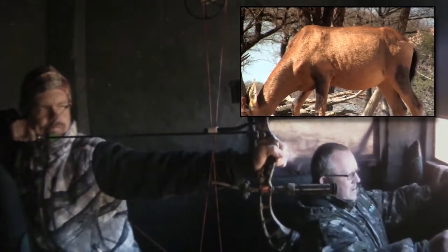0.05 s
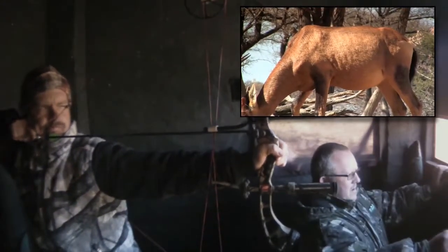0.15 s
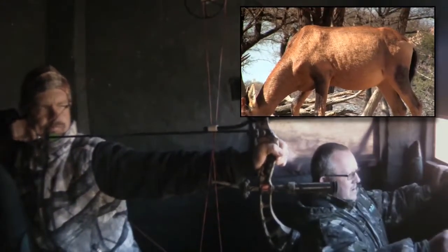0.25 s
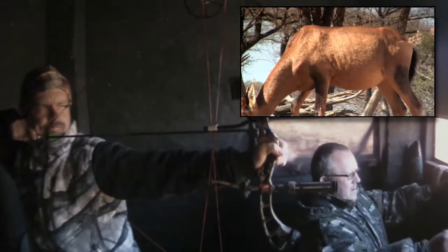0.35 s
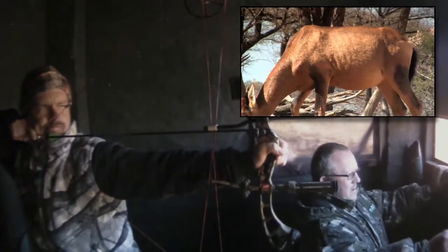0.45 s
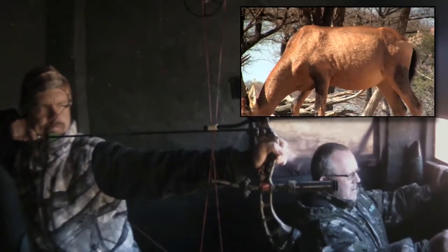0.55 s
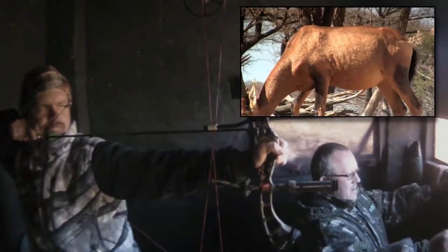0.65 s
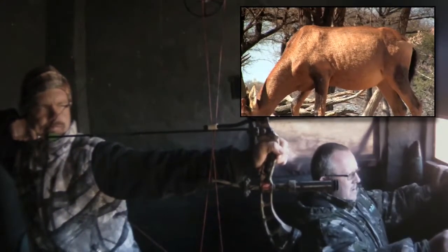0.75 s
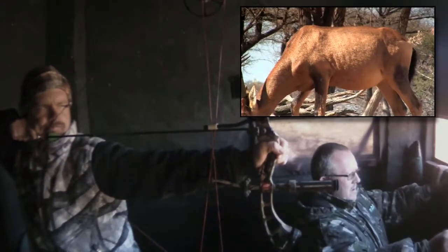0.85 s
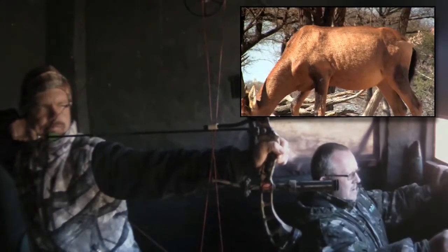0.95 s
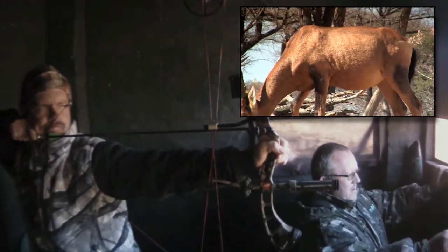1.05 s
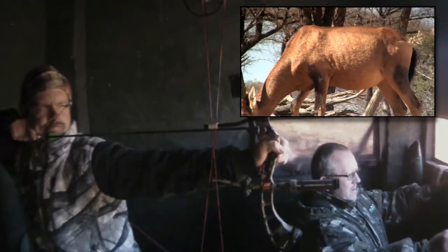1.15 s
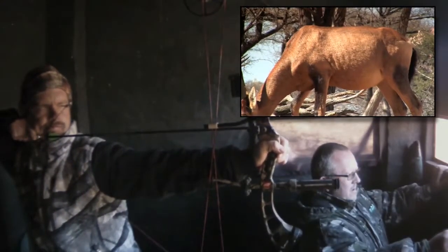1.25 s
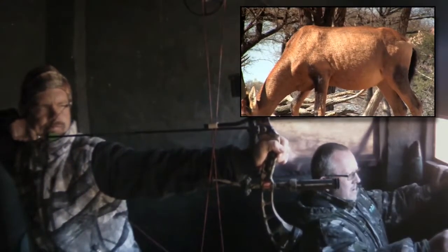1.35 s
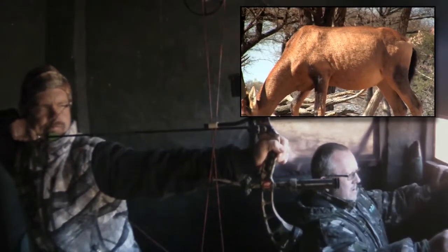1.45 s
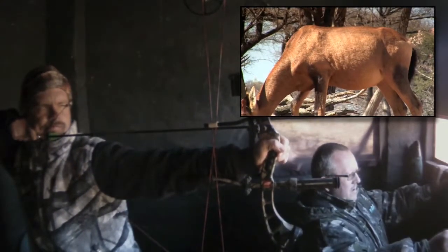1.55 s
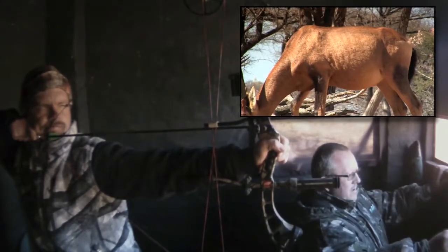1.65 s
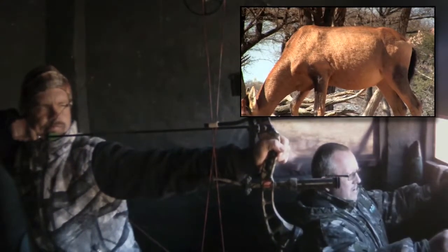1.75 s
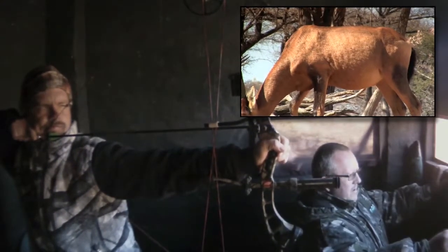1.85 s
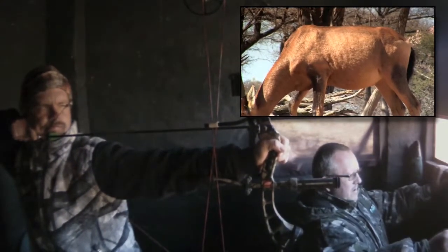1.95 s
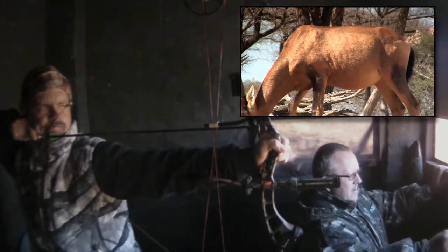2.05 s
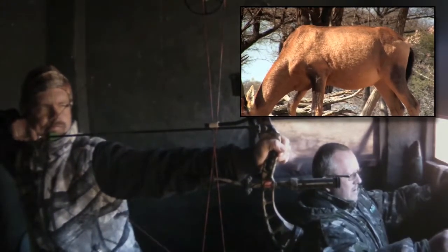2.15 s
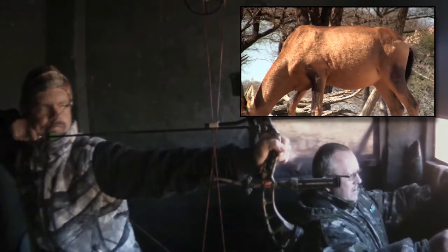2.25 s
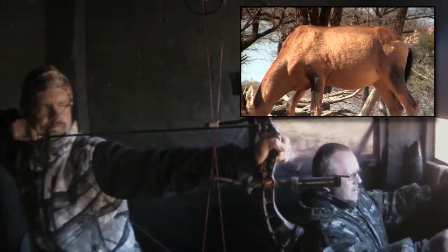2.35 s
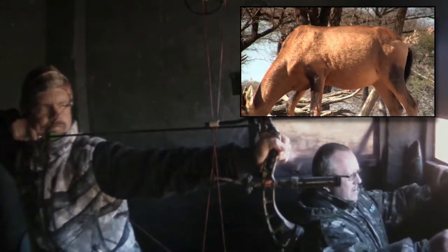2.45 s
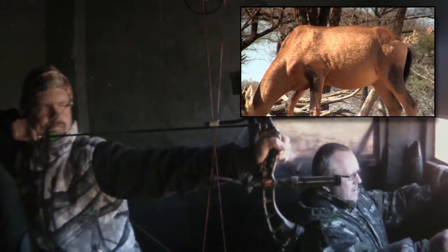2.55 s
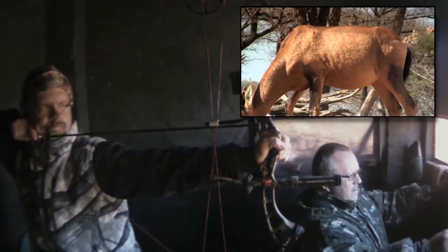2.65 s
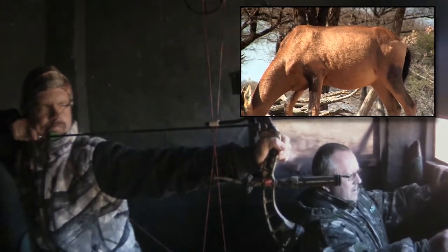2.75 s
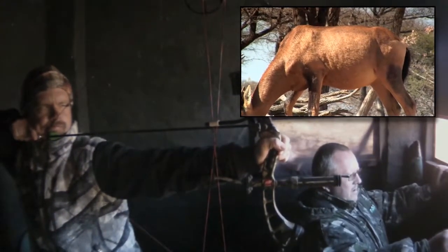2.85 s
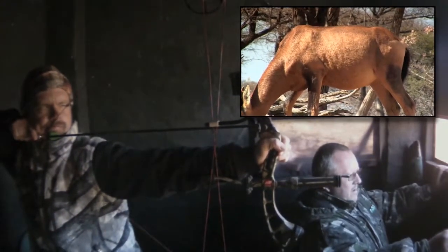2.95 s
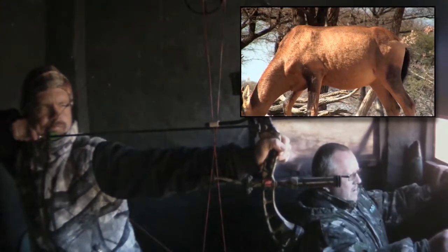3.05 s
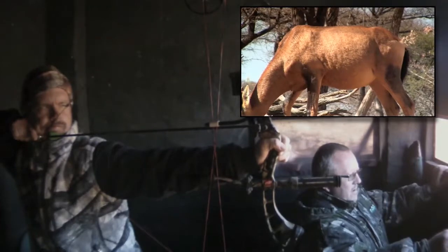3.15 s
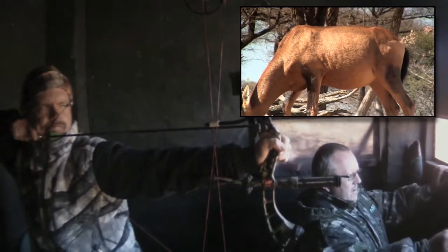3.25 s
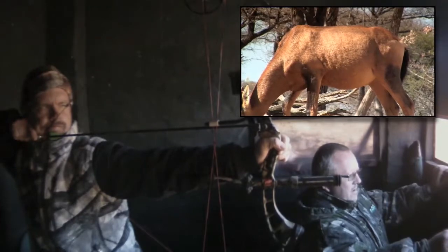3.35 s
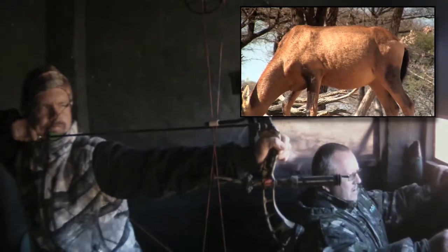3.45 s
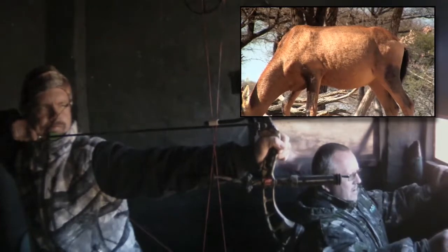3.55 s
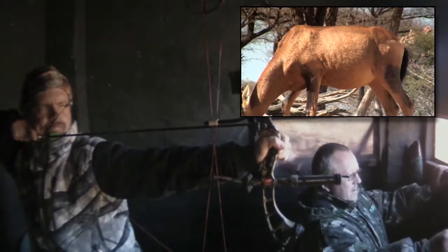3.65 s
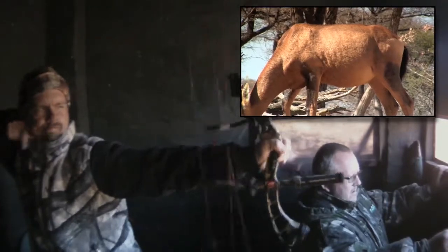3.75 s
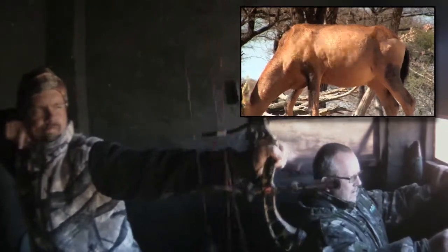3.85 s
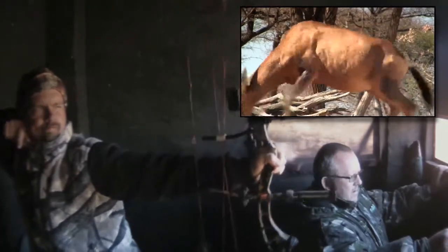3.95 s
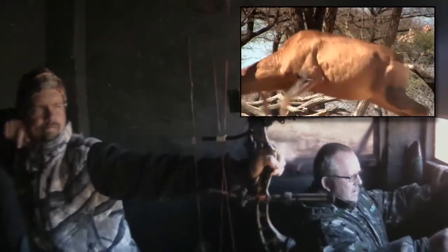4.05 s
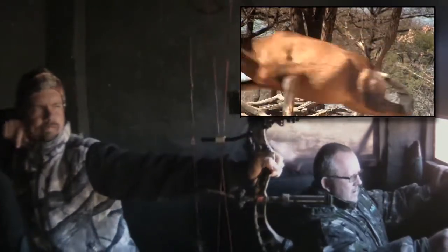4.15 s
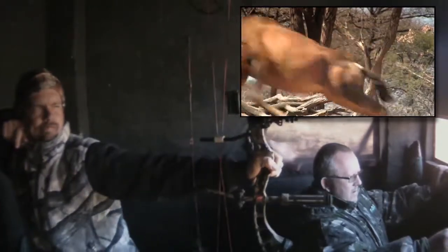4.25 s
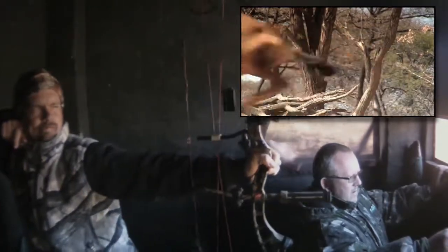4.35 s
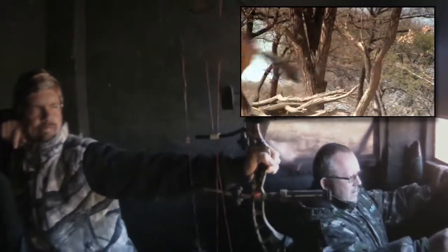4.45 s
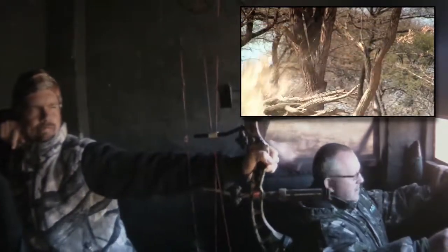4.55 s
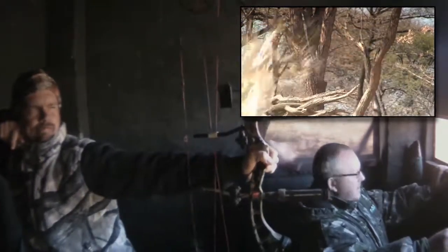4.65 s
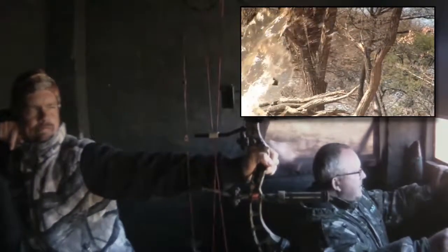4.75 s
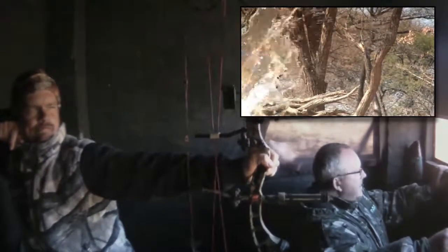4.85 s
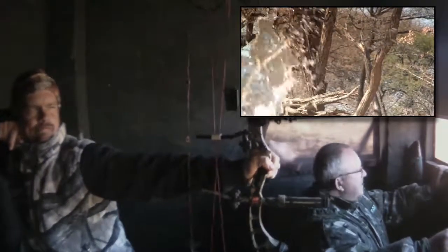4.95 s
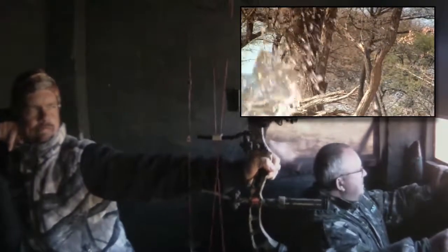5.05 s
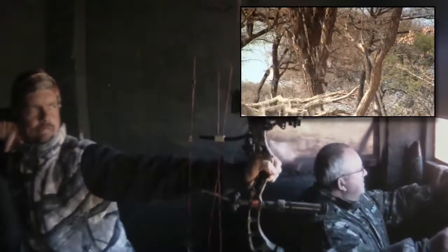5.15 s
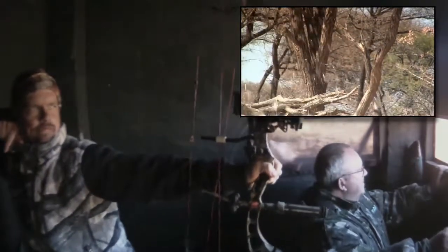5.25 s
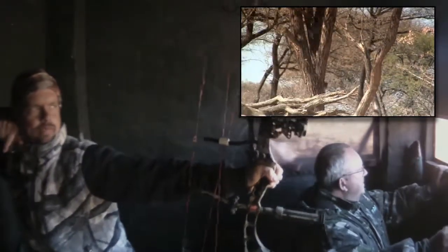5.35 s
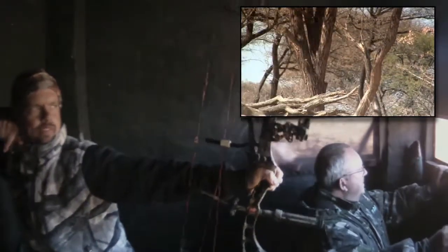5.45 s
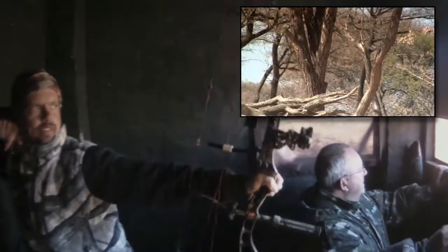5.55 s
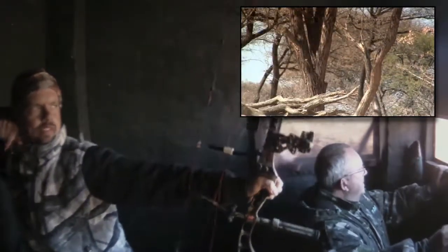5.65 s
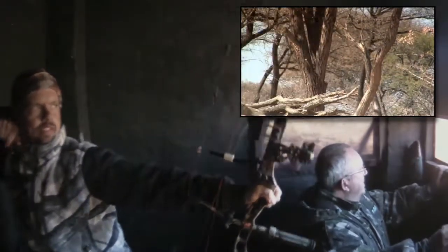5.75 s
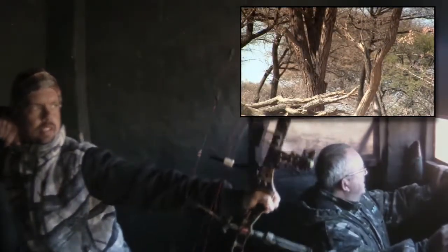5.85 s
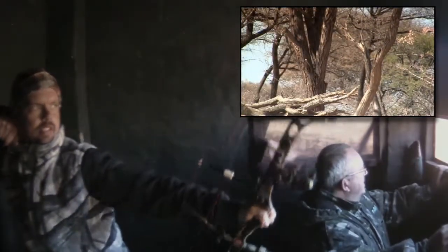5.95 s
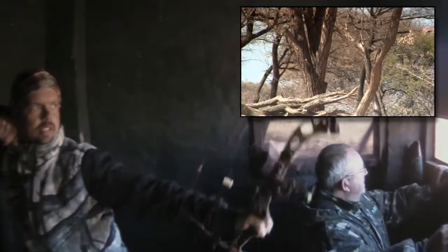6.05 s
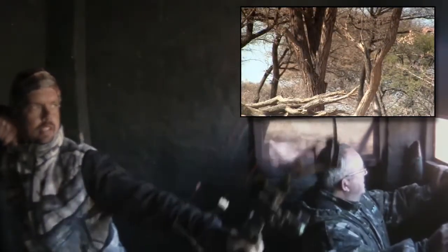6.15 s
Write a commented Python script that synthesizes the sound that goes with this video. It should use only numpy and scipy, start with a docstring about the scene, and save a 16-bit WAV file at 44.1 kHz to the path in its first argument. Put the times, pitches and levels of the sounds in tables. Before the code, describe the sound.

Close, quiet recording position in a blind: gentle hiss, tiny sleeve-like swishes, a few husky chirps far off. After nearly four seconds a bow string slaps home, limbs humming, followed a fraction of a second later by a sharp rattling crack of impact, centred and resonant. The animal leaps off with hollow, muffled hoofbeats, scuffs and sprayed pebbles, fading within two seconds into faint rustle.

```python
"""Over steady microphone hiss, shaped noise with swelling gain makes a faint treble rustle, perhaps of
a sleeve, and gliding sines make a distant bird. A compound bow is then loosed inside a hunting blind:
noise bursts are the string slapping home and dying sines the humming limbs. A moment later bright
bursts crack as the arrow strikes an antelope, whose chest rings. The animal gallops off over dry
ground, in chance knocks that ring hollow modes, scuffs of noise and a spray of grit and pebbles."""
import sys
import numpy as np
from scipy import signal
from scipy.io import wavfile
from scipy.ndimage import uniform_filter1d

SR = 44100
rng = np.random.default_rng(int(sys.argv[2]) if len(sys.argv) > 2 else 0)


def master(y):
    """Save y as 16-bit WAV."""
    cut = np.clip(np.atleast_2d(y).T, -1, 1)
    pcm = np.round(cut * 32767)  # scale
    wavfile.write(sys.argv[1], SR, pcm.astype(np.int16))


N = 273506

# Likeness of the two channels for sounds from ahead. Each row: frequency in Hz, likeness from 0 to 1.
AHEAD_LIKENESS = [(100, 1), (15000, 1)]


def gain_of(db):
    """Amplitude ratio: 20 dB is a factor of ten."""
    return 10 ** (np.asarray(db) / 20)


def evened(x):
    """Normalization: scales to a root mean square of 1."""
    return x / np.sqrt(np.mean(x ** 2) + 1e-20)


def read(points, hz):
    """Spectral interpolation: reads a table in straight lines over log frequency."""
    f, value = np.transpose(points)
    return np.interp(np.log(hz + 1), np.log(f + 1), value)


def noise(count, colour, likeness, size=512, tilt_db=0., decay=None, patchy_db=0., balance=None):
    """Spectral shaping: random short-time spectra are weighted by band, and correlated between channels."""
    hop = size // 4
    frames = count // hop + 5
    hz = np.fft.rfftfreq(size, 1 / SR)
    a, b, c, d, patches = rng.standard_normal((frames, len(hz), 5)).T
    # smoothing over neighbouring bands and frames makes the patches
    patches = uniform_filter1d(patches, size=8, axis=0)
    patches = evened(uniform_filter1d(patches, size=8, axis=1))

    alike = np.clip(read(likeness, hz), -1, 1)[:, None]
    left = a + 1j * b
    right = alike * left + np.sqrt(1 - alike ** 2) * (c + 1j * d)
    spectra = np.array([left, right])

    octaves = np.log2((hz + 100) / 2000)
    shape = evened(gain_of(read(colour, hz) + tilt_db * octaves))
    spectra *= shape[:, None] * gain_of(patchy_db * patches) / np.sqrt(size / 2)
    if balance:
        spectra[1] /= gain_of(read(balance, hz))[:, None]
    if decay:
        frame_s = np.arange(frames) * hop / SR
        spectra *= gain_of(-60 * frame_s / read(decay, hz)[:, None])
    return signal.istft(spectra, nperseg=size, noverlap=size - hop)[1][:, :count]


def ring(modes, t, rise_s):
    """Modal decay: a sum of sines, each at a chance phase and falling 60 dB in its own t60."""
    tones = 0
    for hz, db, t60 in modes:
        tones = tones + gain_of(db - 60 * t / t60) * np.sin(2 * np.pi * (hz * t + rng.random()))
    return tones * (1 - np.exp(-t / rise_s))


def add(mix, s, sound):
    """Superposition: adds a sound to the mix from time s on."""
    part = mix[:, round(s * SR):][:, :sound.shape[-1]]
    part += sound[..., :part.shape[1]]


def flutter(spread_db, count):
    """Random amplitude modulation: quick unevenness of level, as from many small contacts."""
    wander = evened(uniform_filter1d(rng.standard_normal(N), size=count))
    return evened(gain_of(spread_db * wander))


def swishes():
    """Amplitude envelope: the rustle's gain is a smooth hump for each swish over a low bed."""
    # Swishes of the rustle. Each row: middle in seconds, length in seconds, peak level in dB, added
    # to the bed.
    humps = [(.03, .07, -58.5), (.335, .05, -58.5), (.53, .07, -62), (0.622, .06, -64), (.845, .08, -62),
             (1.13, .06, -59.5), (1.32, .06, -65), (1.412, .05, -63), (1.627, .07, -61), (1.715, .045, -61),
             (1.93, .045, -61.5), (2.02, 0.046, -65), (2.13, .04, -64), (2.227, .045, -64),
             (2.509, .12, -54.5), (2.795, .14, -55.5), (2.984, 0.14, -56), (3.133, 0.041, -63),
             (3.285, .16, -58), (3.59, 0.12, -56), (3.745, .05, -58), (4.28, 0.15, -59),
             (4.54, 0.074, -60.5), (4.83, 0.064, -63), (5.084, .18, -62), (5.38, 0.16, -63.5),
             (5.52, .06, -63), (5.81, 0.33, -60), (6.124, 0.047, -60)]
    bed_db, flatness = -78, 2.7  # a higher exponent gives a flatter top
    t = np.arange(N) / SR
    gain = gain_of(bed_db)
    for s, length, db in humps:
        from_middle = abs(2 * (t - s) / length)
        gain = gain + gain_of(db - 6.7 * from_middle ** flatness)
    return gain


def background():
    """Stationary and modulated noise: steady microphone hiss, and a treble rustle that swells and fades."""
    # Spectra of hiss and rustle. Each row: frequency in Hz, relative level in dB per Hz.
    hiss_colour = [(15, -40), (25, -8.5), (209, -1.5), (919, -0.5), (2700, -2.5), (4750, -6.5),
                   (6550, -6.5), (7100, -8.5), (7700, -7.5), (14300, -9.5), (15500, -14.5)]
    rustle_colour = [(2500, -13), (5000, -3), (7000, -2), (8800, -2), (9350, -5.5), (9570, 7.5), (9800, -2),
                     (11700, 1.5), (15500, -5)]
    # Likeness of the hiss in the two channels. Each row: frequency in Hz, likeness from 0 to 1.
    hiss_likeness = [(60, 0.9), (180, 0.86), (550, 0.95), (1650, 0.95), (4970, 0.81), (15000, 0.24)]
    # Balance of the channels. Each row: frequency in Hz, left minus right in dB.
    lean = [(60, 1), (240, 0.0), (950, 0.0), (3770, 0.0), (15000, -1.5)]
    hiss_db = -58
    hiss = evened(noise(N, hiss_colour, hiss_likeness, size=2048, patchy_db=1.2, balance=lean))
    rustle = evened(noise(N, rustle_colour, AHEAD_LIKENESS, patchy_db=2.0, balance=lean))
    return gain_of(hiss_db) * hiss + swishes() * flutter(1.9, count=300) * rustle


def bird():
    """Frequency modulation and reverberation: short, husky, wavering whistles blurred by echoes."""
    # Notes. Each row: start in seconds, length in seconds, first pitch in Hz, last pitch in Hz,
    # level in dB before flutter and echoes.
    notes = [(1.314, 0.022, 3020, 2880, -59.5), (1.427, 0.058, 2480, 2600, -66),
             (1.471, 0.028, 3000, 3280, -59), (1.49, .055, 2960, 2970, -57.5),
             (1.612, .04, 2406, 2446, -61.5), (1.635, 0.044, 3210, 3200, -53),
             (1.668, 0.044, 2960, 2940, -61)]
    out = np.zeros((1, N))
    for s, length, first_hz, last_hz, db in notes:
        count = round(length * SR)
        wander = evened(uniform_filter1d(rng.standard_normal(SR // 10), size=90))[:count]
        pitch_hz = np.linspace(first_hz, last_hz, count) * (1 + 0.015 * wander)
        tone = np.sin(2 * np.pi * np.cumsum(pitch_hz) / SR)
        add(out, s, np.sqrt(2) * gain_of(db) * tone * signal.windows.tukey(count, .6))
    out = out * flutter(2.6, count=120)

    echo_t60_s, echo_db = .25, -4.5
    echoes = rng.standard_normal(8000) * gain_of(-60 * np.arange(8000) / SR / echo_t60_s)
    echoes /= np.linalg.norm(echoes)
    return out + gain_of(echo_db) * signal.oaconvolve(out[0], echoes)[:N]


def blow(db, tilt_db, colour, likeness, decay, rise_s, front_db, front_s):
    """Impact excitation: a noise burst with a hard front, whose bands die at their own rates."""
    t = np.arange(SR // 2) / SR
    burst = noise(len(t), colour, likeness, size=256, tilt_db=tilt_db, decay=decay, patchy_db=1.4)
    front = gain_of(db + front_db * np.exp(-t / front_s))
    return front * (1 - np.exp(-t / rise_s)) * burst


def bow():
    """Impact and free vibration: string slaps die in the blind; the hardest sets the limbs humming."""
    # A soft hiss just ahead, then the string slapping its stop and rebounding. Each row: start in
    # seconds, level in dB beneath the front's boost, treble tilt in dB per octave.
    slaps = [(3.777, -39, 2.5), (3.796, -19, 0.5), (3.810, -27.5, 0.7), (3.836, -34, -2.5)]
    # Spectrum of a slap. Each row: frequency in Hz, relative level in dB per Hz.
    slap_colour = [(24, -39), (40, -12), (183, -20), (359, 1), (740, -4), (881, -3), (1050, -4.5),
                   (1640, -6.5), (4240, -9.5), (13000, -28.5), (15500, -43)]
    # Dying of a slap. Each row: frequency in Hz, t60 in seconds.
    slap_decay = [(100, 0.47), (400, 0.26), (2000, 0.24), (5000, 0.26), (12000, 0.18)]
    # Likeness of a slap in the two channels. Each row: frequency in Hz, likeness from 0 to 1.
    slap_likeness = [(60, 0.99), (180, 0.99), (550, 0.8), (1650, 0.11), (4970, 0.079), (15000, 0.16)]
    # Modes of the limbs. Each row: frequency in Hz, level in dB, t60 in seconds.
    limbs = [(85.5, -40.5, 0.93), (158, -49, 0.98), (250, -35.5, .3), (296, -31.5, 0.46),
             (352.4, -24.5, 0.2), (499, -26, 0.14), (690, -42, 0.2), (894, -39, 0.17), (1262, -36, 0.31)]
    out = np.zeros((2, N))
    for s, db, tilt_db in slaps:
        slap = blow(db, tilt_db, slap_colour, slap_likeness, slap_decay,
                    rise_s=0.0018, front_db=2.5, front_s=0.0078)
        add(out, s, slap)
    hardest_s = slaps[1][0]
    add(out, hardest_s, ring(limbs, np.arange(SR) / SR, rise_s=0.00067))
    return out


def arrow():
    """Impact and cavity resonance: bright cracks, the hardest ringing the hollow chest, then a low hum."""
    # A hiss just ahead, then the arrow striking bone and rattling through. Each row: start in
    # seconds, level in dB beneath the front's boost, treble tilt in dB per octave.
    cracks = [(3.93, -23, 0.5), (3.949, -14.5, 1.5), (3.972, -24, -4), (3.990, -24, -0.2),
              (4.010, -23.5, -4), (4.030, -27.5, -3.5), (4.050, -32, -2.5), (4.073, -43, 4),
              (4.101, -44.5, 3.5)]
    # Spectrum of a crack. Each row: frequency in Hz, relative level in dB per Hz.
    crack_colour = [(60, -42), (200, -34), (400, -6), (700, -8), (1300, -13), (2400, -6.5), (4000, 2),
                    (5500, -6.5), (9000, -15.5), (15500, -22)]
    # Dying of a crack. Each row: frequency in Hz, t60 in seconds.
    crack_decay = [(150, 0.48), (500, 0.23), (2000, 0.28), (4000, 0.22), (12000, 0.13)]
    # Likeness of a crack in the two channels. Each row: frequency in Hz, likeness from 0 to 1.
    crack_likeness = [(60, 1.0), (180, 1.0), (550, 1.0), (1650, 1.0), (4970, 1.0), (15000, 1.0)]
    # Modes of the chest, and two low tones after the hit. Each row: frequency in Hz, level in dB
    # (the chest's before flutter), t60 in seconds.
    chest = [(210.4, -40, 1), (269, -30, 0.58), (310, -32.5, 0.43), (385.5, -21.5, 0.8), (517, -28, 0.42),
             (633, -29, 0.3), (1250, -32, 0.4)]
    hum = [(78, -43.5, 1.28), (106, -45.5, 1.05)]
    hum_s = 4.015
    chest_damped_s = 4.2  # the animal leaps and the chest stops ringing
    out = np.zeros((2, N))
    t = np.arange(SR) / SR
    for s, db, tilt_db in cracks:
        crack = blow(db, tilt_db, crack_colour, crack_likeness, crack_decay,
                     rise_s=0.0013, front_db=1.5, front_s=0.0094)
        add(out, s, crack)
    hardest_s = cracks[1][0]
    damping = 1 / (1 + np.exp((hardest_s + t - chest_damped_s) / 0.011))
    add(out, hardest_s, ring(chest, t, rise_s=0.0055) * damping * flutter(4.15, count=600)[:SR])
    add(out, hum_s, ring(hum, t, rise_s=0.009))
    return out


def knocks(count, modes, per_s, spread_db):
    """Random impulses into resonators: each chance blow rings one mode; modes are returned separately."""
    sizes = gain_of(spread_db * np.minimum(rng.exponential(1, count), 3))
    sizes = sizes * (rng.random(count) < per_s / SR)
    struck = rng.integers(0, len(modes), count)
    t = np.arange(SR // 4) / SR
    rings = []
    for k, mode in enumerate(modes):
        rings.append(signal.oaconvolve(sizes * (struck == k), ring([mode], t, rise_s=0.00029)))
    return np.array(rings)[:, :count] / np.std(sum(rings))


def strides(t, column, lag_s, fall_db_s):
    """Power summation: the gain of one layer, each landing rising, holding and dying over the steady run."""
    # The steady run, swelling and then fading with distance. Each row: time in seconds, thud of
    # hooves in dB, spray of grit in dB.
    steady = np.array([(4.3, -56.5, -74), (4.6, -70, -72), (4.73, -64, -76), (4.79, -54.5, -67),
                       (4.9, -48.5, -63), (5.1, -47.5, -61), (5.2, -44.5, -57), (5.27, -50, -58),
                       (5.38, -46, -56), (5.5, -53.5, -58), (5.6, -49, -58), (5.75, -51, -56.5),
                       (6.0, -58.5, -61), (6.2, -67, -67)])
    # Hard landings that stand out of the run. Each row: start in seconds, hold in seconds, thud in
    # dB, grit in dB.
    landings = [(4.167, 0.029, -38.5, -47.5), (4.378, 0.034, -54, -56.5), (4.654, 0.051, -54.5, -64),
                (4.81, 0.033, -48, -51.5), (4.975, 0.067, -47, -47.5)]
    rise_s = 0.01
    power = gain_of(np.interp(t, steady[:, 0], steady[:, column], left=-120)) ** 2
    for row in landings:
        since = t - row[0] - lag_s
        rise = np.clip(since / rise_s, 0, 1)
        fall_db = fall_db_s * np.maximum(since - rise_s - row[1], 0)
        power = power + (rise * gain_of(row[column + 1] - fall_db)) ** 2
    return np.sqrt(power)


def gallop():
    """Impact and friction: hollow hoofbeats and scuffs on hard soil, with grit and pebbles kicked up."""
    # The soil under the hooves. Each row: time in seconds, centre of its ring in Hz, share of light
    # scuffing from 0 to 1.
    soil = [(4.15, 476, 0.0), (4.3, 507, 0.01), (4.4, 310, 0.01), (4.68, 617, .75), (4.85, 520, 0.27),
            (5.0, 497, 0.04), (5.17, 354, 0.06), (5.38, 380, 0.06), (5.55, 480, 0.28), (6.2, 440, 0.15)]
    # Modes rung by hoofbeats and by pebbles. Each row: frequency in Hz, relative level in dB, t60 in
    # seconds.
    hollow = [(184, -1.5, 0.11), (269, -3, 0.085), (340.3, 0, 0.093), (429.4, -2, 0.1),
              (554.6, -1.5, 0.097), (652, -3.5, 0.075)]
    pebble = [(3270, -10, 0.0082), (3877, -1.5, 0.035), (4190, -3, 0.022), (4640, -5, 0.0076),
              (5400, -3, 0.011), (6830, -4, 0.0096)]
    # Spectra of thud, scuff and grit. Each row: frequency in Hz, relative level in dB per Hz.
    thud_colour = [(30, -38), (60, -20), (115, -17.5), (165, -3), (264, -6.5), (436, 0), (900, -18.5),
                   (2500, -26.5), (4000, -60)]
    scuff_colour = [(200, -31), (400, -2), (600, 6.5), (800, 6), (1100, -0.5), (2000, -8.5), (3500, -37)]
    grit_colour = [(1200, -13), (2500, -5), (3400, -1.5), (3950, -2.5), (4500, -6.5), (6000, -10),
                   (9000, -19.5), (14000, -30)]
    # Likeness of scuffs in the two channels. Each row: frequency in Hz, likeness from 0 to 1.
    scuff_likeness = [(200, 0.74), (700, 0.88), (2500, 0.77)]

    s, centre_hz, share = np.transpose(soil)
    t = np.arange(round(s[0] * SR), N) / SR
    count = len(t)
    light = np.clip(np.interp(t, s, share), 0, 1)

    octaves_off = np.log2(np.array(hollow)[:, :1] / np.interp(t, s, centre_hz))
    favour = gain_of(-12 * octaves_off ** 2)  # modes near the centre ring loudest
    favour /= np.sqrt((favour ** 2).mean(axis=0))
    hooves = (favour * knocks(count, hollow, per_s=400, spread_db=1.5)).sum(axis=0)
    rumble = evened(noise(count, thud_colour, AHEAD_LIKENESS, size=1024, patchy_db=1.0))
    thud = gain_of(-5.0) * rumble + gain_of(-2.5) * hooves

    scuff = evened(noise(count, scuff_colour, scuff_likeness, size=1024, patchy_db=3.5))
    scuff = scuff * flutter(1.7, count=200)[:count]
    ground = np.sqrt(1 - light) * thud + np.sqrt(light) * scuff  # shares of power

    spray = evened(noise(count, grit_colour, AHEAD_LIKENESS, patchy_db=0.0))
    pebbles = knocks(count, pebble, per_s=1100, spread_db=3.0).sum(axis=0)
    grit = gain_of(-2.5) * spray + gain_of(-6) * pebbles

    out = np.zeros((2, N))
    out[:, -count:] = (strides(t, column=1, lag_s=0, fall_db_s=162) * ground
                       + strides(t, column=2, lag_s=0.0059, fall_db_s=182) * grit)
    return out


def scene():
    """Superposition: all the sources sum at the microphones."""
    return background() + bird() + bow() + arrow() + gallop()


def record(dry):
    """Gain modulation and low-pass filtering: the level dips briefly, then the band is limited."""
    # The dip before the arrow's hardest crack: middle in seconds, half width in seconds, depth in dB.
    s, width, db = (3.9265, 0.0048, -10)
    edge_hz = 15550
    dipped = dry * gain_of(db * np.exp(-((np.arange(N) / SR - s) / width) ** 2))
    low_pass = signal.firwin(511, edge_hz, window=("kaiser", 9), fs=SR)
    return signal.oaconvolve(dipped, low_pass[None], "same")


dry = scene()
out = record(dry)
master(out)
```